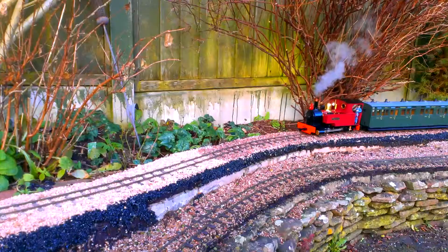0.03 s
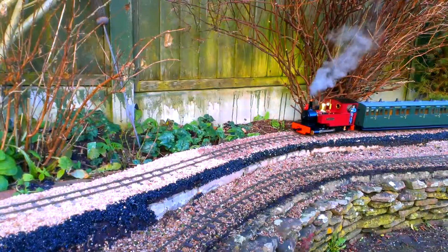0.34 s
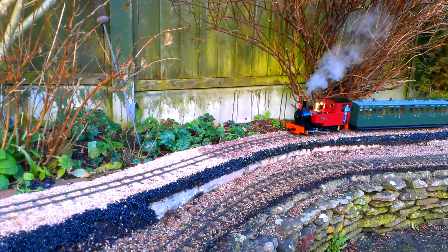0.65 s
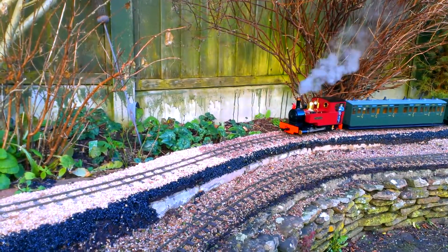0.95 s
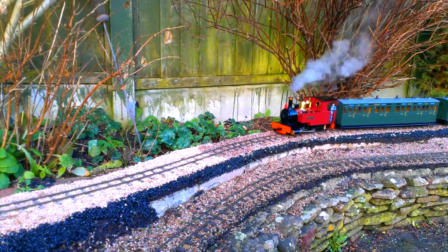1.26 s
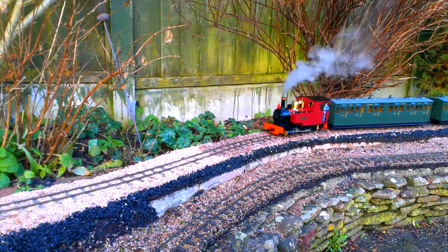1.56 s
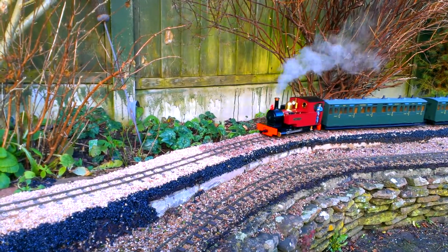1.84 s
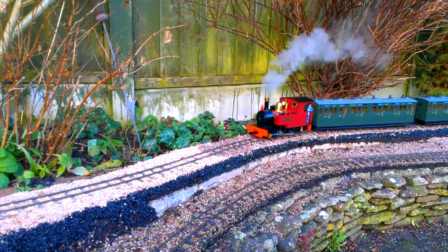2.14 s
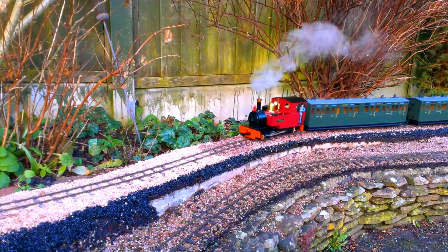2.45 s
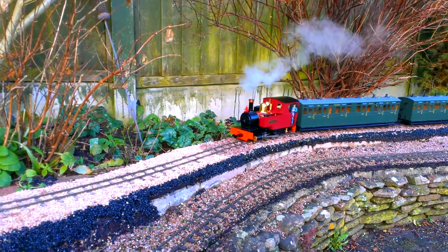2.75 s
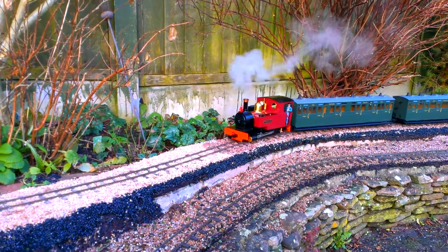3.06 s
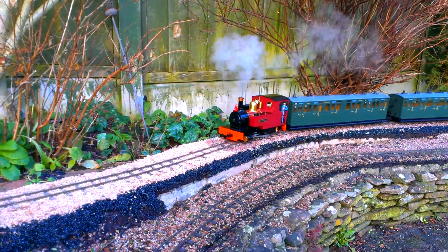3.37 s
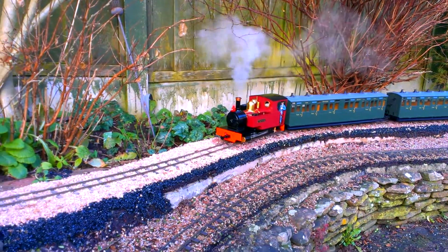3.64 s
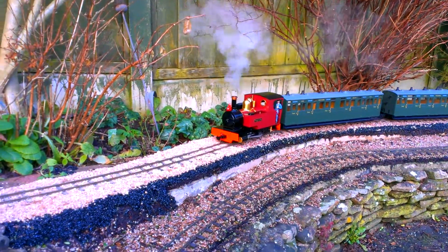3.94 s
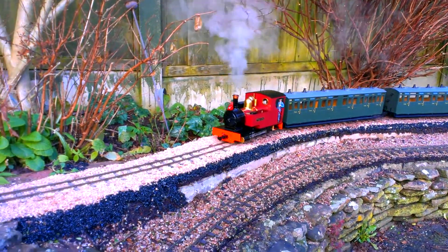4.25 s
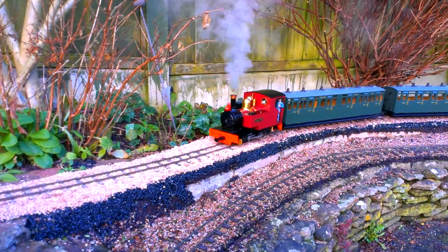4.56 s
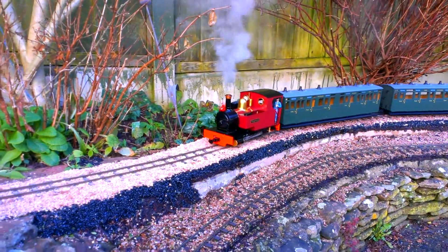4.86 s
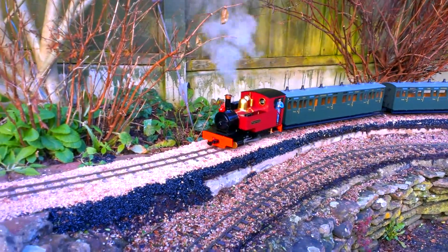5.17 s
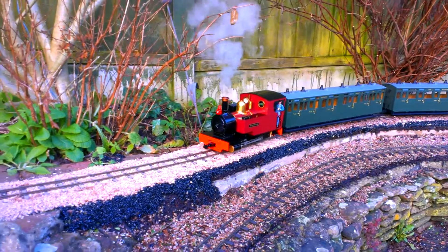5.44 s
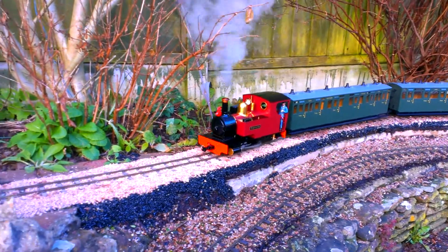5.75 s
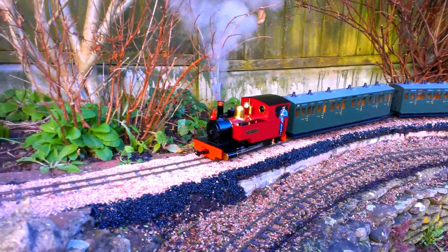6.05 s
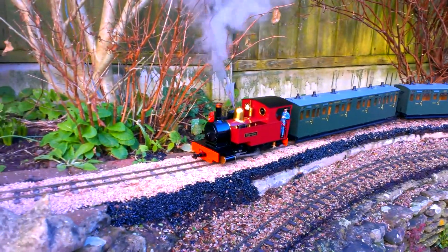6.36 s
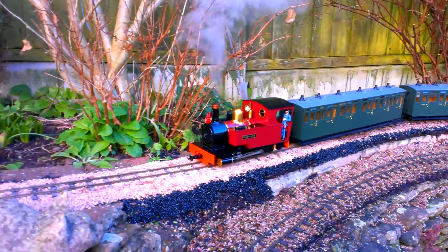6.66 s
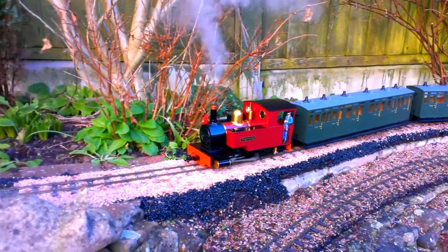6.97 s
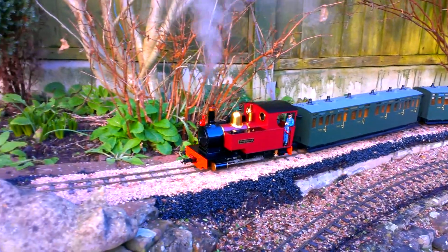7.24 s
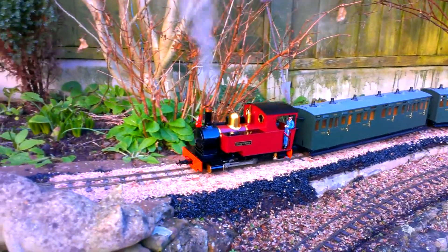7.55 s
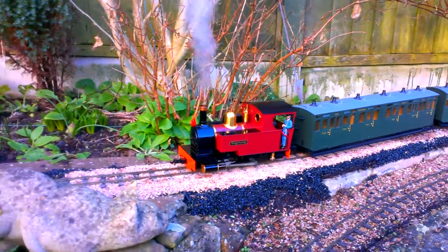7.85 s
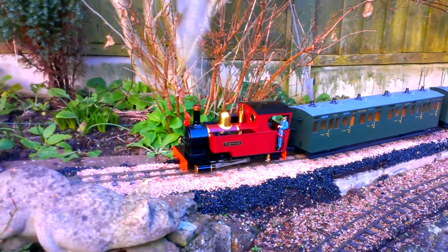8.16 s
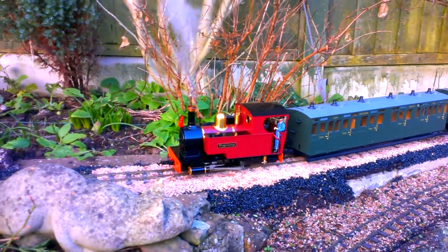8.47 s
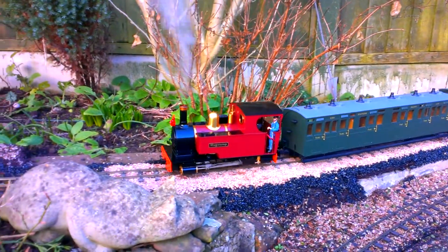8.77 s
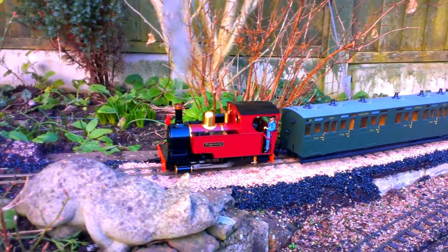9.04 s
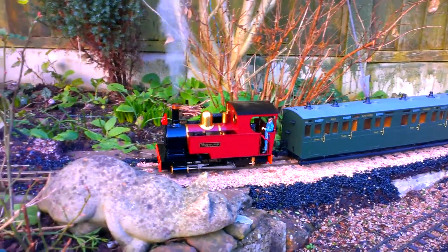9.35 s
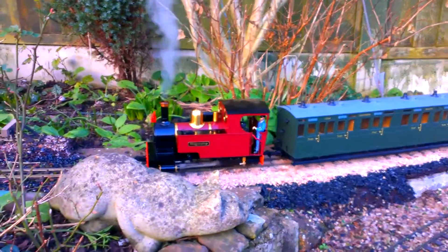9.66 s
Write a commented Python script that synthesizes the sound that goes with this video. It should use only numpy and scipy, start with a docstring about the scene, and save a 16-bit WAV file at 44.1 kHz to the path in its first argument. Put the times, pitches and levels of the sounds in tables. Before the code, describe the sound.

A small model steam locomotive is heard outdoors from the very start, chuffing at about six puffs a second in a slightly uneven four-beat pattern. Each puff is a bright, wet burst of steam with a light ring from the chimney, and a thin, high, whistling hiss leaks between the beats. At about 2 seconds the engine stops labouring: the ring softens and the high hiss becomes clearer. From about 3 to 8 seconds it comes steadily closer to the single microphone, the puffs growing fuller and their tone sweeping gently. Underneath are a soft, flickering burner roar, a faint wheel rumble and a barely audible distant drone. The wheels knock softly over rail joints around 3.5 and 4.5 seconds, and a few more times between 7 and 9 seconds. The hiss swells at about 9 seconds, with the engine close and still chuffing.

```python
"""Live-steam garden locomotive

A small engine pulls its carriages towards one microphone, at about six chuffs a second. Turbulent steam
leaks and puffs through blast pipe and chimney, spitting droplets; the burner roars softly and the wheels
rumble over a faint, distant drone. Reflections from the ground, a wall and a wooden fence interfere with
the direct sound, so that its colour sweeps as the engine comes nearer."""
import sys
import numpy as np
from scipy import signal
from scipy.fft import rfft, irfft
from scipy.io import wavfile
from scipy.ndimage import uniform_filter1d, map_coordinates

SR = 44100
rng = np.random.default_rng(int(sys.argv[2]) if len(sys.argv) > 2 else 0)


def generate_wav(signal):
    """Clip the signal to [-1, 1] and save it as 16-bit WAV at the path in sys.argv[1]."""
    frames = np.transpose(np.atleast_2d(signal))
    scaled = np.clip(frames, -1, 1) * 32767
    pcm = np.round(scaled).astype(np.int16)
    wavfile.write(sys.argv[1], SR, pcm)


N = 428211
TIME = np.arange(N) / SR

# spectra of the drone, rolling wheels, joint knocks and burner: (frequency [Hz], level [dB])
DRONE_SPECTRUM = [(22, -20), (45, -25), (70, -15), (95, -8), (113, -1.5), (130, -12), (200, -12)]
RUMBLE_SPECTRUM = [(60, -42), (110, -45), (140, -18), (190, -5.5), (300, 0), (370, 1), (500, -4.5),
                   (700, -14.5), (1300, -42), (3000, -23)]
KNOCK_SPECTRUM = [(130, -21), (240, -11), (350, 14), (430, 4), (700, -20), (1400, -26)]
BURNER_SPECTRUM = [(450, -21.5), (680, -12.5), (800, -7), (920, 2.5), (1010, -1.5), (1150, -17),
                   (1600, -28)]
# spectra of the five voices of the exhaust: (frequency [Hz], level [dB])
GUSH_SPECTRUM = [(700, -27.5), (1130, -16), (1380, 2), (1600, -4.5), (1870, 3), (2300, 0), (2650, -2.5),
                 (3050, 4), (3400, -2.5), (4000, -31)]
HISS_SPECTRUM = [(4300, -8), (4950, -12.5), (5500, -8), (6300, -0.5), (6900, 2.5), (7300, -7.5),
                 (8000, -24)]
SPRAY_SPECTRUM = [(9500, -10), (10600, -6), (11400, -6.5), (12700, -3), (14000, -6.5), (16000, -8)]
CHIMNEY_SPECTRUM = [(2700, -13), (3400, -13.5), (3650, 1), (3850, 2), (4080, -2.5), (4400, -9.5),
                    (4800, -16.5), (5700, -28)]
NOZZLE_SPECTRUM = [(6800, -29), (7500, -20), (8100, -10), (8650, -4.5), (9020, 2.5), (9350, -4.5),
                   (9900, -15), (10600, -23), (11400, -42), (14000, -49)]
# wheels meeting rail joints: (time [s], relative level [dB])
JOINT_KNOCKS = [(3.581, -50), (4.486, -48), (7.225, -55.5), (8.457, -42.5), (8.795, -43), (9.226, -48.5)]
# exhaust beats, four to a wheel turn: (crest time [s], relative level [dB], added chimney ring [dB])
EXHAUST_BEATS = [(.151, -24, 3.5), (0.375, -20, 3), (.625, -19, 2), (.778, -20.5, 2), (0.987, -16, -1),
                 (1.205, -16.5, 0.5), (1.411, -19, 1), (1.534, -19, 1), (1.725, -14.5, 0.5),
                 (1.925, -19.5, 3), (2.13, -20.5, 3.5), (2.255, -21, 6), (2.428, -19.5, 2),
                 (2.617, -18.5, 2.5), (2.78, -18.5, -1.5), (2.9, -17.5, 1.5), (3.049, -17.5, 4.5),
                 (3.239, -19.5, -2.5), (3.42, -20.5, 0.5), (3.537, -22, 0), (3.693, -19.5, 0),
                 (3.87, -19, -1.5), (4.049, -21, -1), (4.168, -20, -4), (4.336, -18, -7), (4.514, -19, -6),
                 (4.696, -16.5, -1), (4.812, -20, -1.5), (4.957, -18, -2.5), (5.122, -17.5, 2),
                 (5.283, -17, -0.5), (5.391, -19, -1), (5.541, -18.5, 2), (5.704, -16.5, 0.5),
                 (5.876, -19, -1.5), (5.984, -18, -4.5), (6.149, -17, -9.5), (6.323, -15.5, -3),
                 (6.494, -19.5, 1.5), (6.613, -20, -1), (6.761, -18, -0.5), (6.945, -17, 1),
                 (7.12, -19.5, 4), (7.235, -19, 2), (7.401, -18.5, 2), (7.589, -16.5, 2.5), (7.78, -14, 2),
                 (7.911, -16, -2), (8.109, -19, 0.5), (8.327, -21, 4), (8.541, -24, 6), (8.67, -23.5, 2.5),
                 (8.862, -24, 4), (9.049, -21, 5.5), (9.249, -23, -0.5), (9.371, -20.5, -7),
                 (9.544, -19.5, -10)]
# slow swells of three voices: (time [s], gush gain [dB], hiss gain [dB], burner gain [dB])
VOICE_SWELLS = [(0, 1, -0.5, 2.5), (1.9, 2.5, 0.5, -0.5), (2.5, 0.5, 0, 2.5), (3.05, 3, 1.5, 0.5),
                (3.55, -1, 6, -1), (4.5, 2, -1, -0.5), (5.1, -0.5, 0.5, 2), (5.9, 0.5, -5.5, 6.5),
                (6.4, 0.5, -2, 2), (7.5, 0.5, -4, -0.5), (8.3, 3, -1.5, 0.5), (9.1, 2.5, 8.5, 1.5),
                (9.7, -1.5, 7.5, 3.5)]
# the engine's approach: (time [s], nearness [0 far, 1 close], ground reflection lag [ms], its gain [ratio])
APPROACH_PATH = [(0, 0.076, 0.24, 0.1), (2, 0.026, 0.21, 0.39), (3.5, 0.24, 0.25, 0.6),
                 (4.3, .31, 0.27, 0.72), (5.3, 0.48, 0.34, 0.23), (6, 0.67, 0.52, 0.48),
                 (7, .79, 0.5536, 0.52), (8, 0.97, 0.71, 0.18), (9.2, .99, 0.83, 0.72),
                 (9.7, 0.99, 0.81, 0.64)]
# wall, stones and fence: (far lag [ms], close lag [ms], gain [ratio to ground reflection], cutoff [Hz])
REFLECTORS = [(1.126, 1.704, 0.67, 2700), (0.88, 2.6, 0.32, 3700), (1.61, 4.45, 0.16, 4600),
              (2.5, 5.85, 0.56, 9100)]
# weak echoes off stones, shrubs and carriages: (lag after the ground reflection [ms], level [dB])
SCATTERED_ECHOES = [(2.9, -20), (7.3, -14.5), (12.6, -16.5), (21, -21), (33, -23)]

# relative voice levels: (engine labouring [dB], engine eased [dB], gain when close [dB])
DRONE_DB, RUMBLE_DB, BURNER_DB = (-76, -85, -4), (-58.5, -64.5, 9.5), (-46, -56, 8)
GUSH_DB, HISS_DB, SPRAY_DB = (-12.5, -16.5, 6.5), (-17, -15.5, -2), (-28, -25.5, 2)
CHIMNEY_DB, NOZZLE_DB = (-0.65, -11, 5.2), (-7.5, -0.95, -2.5)
# resonance centres: (far [Hz], close [Hz])
CHIMNEY_HZ, NOZZLE_HZ = (3770, 4110), (8970, 9090)

EASE_AT_S, EASE_LENGTH_S = 1.858, 0.15  # the engine stops labouring
RISE_S, FADE_SHARE = 0.018, 0.33  # a puff rises as the valve opens and fades over a share of the gap
AFTERPUFF_SHARE, AFTERPUFF_DB, AFTERPUFF_S = 0.572, -9, 0.023  # place in gap, level re beat, half-width
LEAK_DB, LEAK_FOLLOW = -26.5, 0.32  # steam between beats; dB gained per dB of beat level


def undb(db):
    """Amplitude grows tenfold for every 20 dB."""
    return 10 ** (np.asarray(db) / 20)


def curves(table):
    """Linear interpolation turns each column after the first into a function of time."""
    times, *columns = np.transpose(table)
    return [np.interp(TIME, times, column) for column in columns]


def wander(rate_hz):
    """Random modulation of unit variance, interpolated between rate_hz values a second."""
    drift = np.interp(TIME * rate_hz, np.arange(N // 10), rng.standard_normal(N // 10))
    return drift / np.std(drift)


def shaped(source, spectrum):
    """Source-filter principle: impose a spectrum, with skirts of 40 dB an octave, at unit rms."""
    hz, db = np.transpose(spectrum)
    octave = np.log2(np.fft.rfftfreq(N, 1 / SR) + 1)
    skirt_db = 40 * np.abs(octave - np.clip(octave, np.log2(hz[0]), np.log2(hz[-1])))
    response = undb(np.interp(octave, np.log2(hz), db) - skirt_db)
    filtered = irfft(rfft(source) * response, N)
    return filtered / np.std(filtered)


def retuned(sound, ratio):
    """Time scaling shifts all resonances by the same changing ratio."""
    return map_coordinates(sound, [np.cumsum(ratio)], order=3, mode="grid-wrap")


def delayed(sound, lag_ms):
    """Propagation delay over a longer path, whose length may change."""
    return map_coordinates(sound, [np.arange(N) - lag_ms * SR / 1000], order=3)


def reflected(sound, lag_ms, cutoff_hz):
    """A rough surface scatters the treble away, so its reflection is dull as well as late."""
    lowpass = signal.butter(2, min(cutoff_hz, 0.45 * SR), fs=SR, output="sos")
    return delayed(signal.sosfiltfilt(lowpass, sound), lag_ms)


def voice_db(levels):
    """Gains add in decibels: one term for the engine's effort, one for its nearness."""
    labour_db, eased_db, close_db = levels
    eased = np.clip((TIME - EASE_AT_S) / EASE_LENGTH_S + 0.5, 0, 1)
    nearness = curves(APPROACH_PATH)[0]
    return labour_db + (eased_db - labour_db) * eased + close_db * nearness


def distant_drone():
    """Amplitude-modulated low noise: a faint drone that wavers, strongest at first."""
    return undb(voice_db(DRONE_DB) + 1.4 * wander(6.3)) * shaped(rng.standard_normal(N), DRONE_SPECTRUM)


def garden_reflections(sound):
    """Comb filtering: reflections interfere with the sound; the notches sweep as their lags change."""
    nearness, ground_ms, ground_gain = curves(APPROACH_PATH)
    with_ground = sound + ground_gain * reflected(sound, ground_ms, cutoff_hz=6000)  # off gravel
    walls = sum(gain * reflected(with_ground, far_ms + (close_ms - far_ms) * nearness, cutoff_hz)
                for far_ms, close_ms, gain, cutoff_hz in REFLECTORS)
    scattered = sum(undb(db) * delayed(with_ground, ground_ms + ms) for ms, db in SCATTERED_ECHOES)
    return with_ground + ground_gain * walls + scattered


def wheels():
    """Rolling contact excites a low rumble; impacts at the rail joints add soft knocks."""
    rolling = undb(voice_db(RUMBLE_DB) + 1.6 * wander(24))
    rumble = rolling * shaped(rng.standard_normal(N), RUMBLE_SPECTRUM)
    impacts = sum(undb(db) * np.exp(-((TIME - at_s) / 0.034) ** 2) for at_s, db in JOINT_KNOCKS)
    return rumble + undb(-5) * impacts * shaped(rng.standard_normal(N), KNOCK_SPECTRUM)


def burner():
    """Combustion noise, coloured by the resonance of the flue, makes a soft, flickering roar."""
    flame = shaped(rng.standard_normal(N), BURNER_SPECTRUM)
    _, _, swell_db = curves(VOICE_SWELLS)
    return undb(voice_db(BURNER_DB) + swell_db + 1.77 * wander(26)) * flame


def steam_flow():
    """Incoherent powers add: leak, beats and afterpuffs give the envelopes of flow and chimney ring."""
    times, levels, _ = np.transpose(EXHAUST_BEATS)
    gaps = np.append(np.diff(times), np.diff(times).mean())
    flow_power = undb(LEAK_DB + LEAK_FOLLOW * np.interp(TIME, times, levels - levels.mean())) ** 2
    ring_power = flow_power.copy()
    jitter = rng.standard_normal((len(EXHAUST_BEATS), 2))
    for (crest_s, db, ring_db), gap, (late, loud) in zip(EXHAUST_BEATS, gaps, jitter):
        span = slice(*np.searchsorted(TIME, [crest_s - 0.25, crest_s + 0.5]))
        age = TIME[span] - crest_s
        beat = np.exp(-np.where(age < 0, (age / RISE_S) ** 2, np.abs(age / (gap * FADE_SHARE)) ** 1.5))
        after_age = age - gap * (AFTERPUFF_SHARE + 0.096 * late)
        afterpuff = undb(AFTERPUFF_DB + 2.35 * loud) * np.exp(-(after_age / AFTERPUFF_S) ** 2)
        puff = undb(db) * np.hypot(beat, afterpuff)
        flow_power[span] += puff ** 2
        ring_power[span] += (undb(ring_db) * puff) ** 2
    return np.sqrt(flow_power), np.sqrt(ring_power)


def wet_steam(eddies, spectrum, spit_db, droplets_per_s=420):
    """Jet noise modulated by eddies, plus shot noise of bursting droplets, filtered to a spectrum."""
    droplets = (rng.random(N) < droplets_per_s / SR) * rng.uniform(-1.03, 1, N)
    jet = eddies * rng.standard_normal(N)
    return shaped(jet + undb(spit_db) * droplets / np.std(droplets), spectrum)


def exhaust():
    """One turbulent flow makes a gush, a hiss and a spray, and drives chimney and nozzle resonances."""
    nearness = curves(APPROACH_PATH)[0]
    chimney_hz, nozzle_hz = (far + (close - far) * nearness for far, close in (CHIMNEY_HZ, NOZZLE_HZ))
    gush_db, hiss_db, _ = curves(VOICE_SWELLS)
    eddies = undb(wander(330) + 0.5 * wander(70))
    gush = undb(voice_db(GUSH_DB) + gush_db) * wet_steam(eddies, GUSH_SPECTRUM, spit_db=-1)
    hiss = undb(voice_db(HISS_DB) + hiss_db) * wet_steam(eddies, HISS_SPECTRUM, spit_db=-17)
    spray = undb(voice_db(SPRAY_DB) + 0.28 * hiss_db) * wet_steam(eddies, SPRAY_SPECTRUM, spit_db=-11)
    # each resonance is shifted from the peak of its spectrum to its moving centre
    ring = retuned(wet_steam(eddies, CHIMNEY_SPECTRUM, spit_db=-9), chimney_hz / 3850)
    whistle = retuned(wet_steam(eddies, NOZZLE_SPECTRUM, spit_db=-13), nozzle_hz / 9020)
    chimney = undb(voice_db(CHIMNEY_DB)) * ring
    nozzle = undb(voice_db(NOZZLE_DB)) * whistle
    flow, ringing = steam_flow()
    # a strong puff is fuller and wetter; the thin leak between puffs favours the nozzle's whistle
    surge = flow / np.sqrt(uniform_filter1d(flow ** 2, size=SR // 2))
    blast = (gush + hiss + spray) * surge ** 0.08 + nozzle * surge ** -0.1
    return undb(-4) * (flow * blast + ringing * chimney)


def scene():
    """Superposition at one point: engine, reflections, wheels and drone, alike in both channels."""
    roar, rolling = burner(), wheels()
    mono = garden_reflections(exhaust() + roar) + rolling + distant_drone()
    return np.array([mono, mono])


def record(dry, start_s=0.1, fade_s=0.025, cutoff_hz=15750):
    """Gating and band limiting: the sound fades in after a brief silence and loses its top treble."""
    fade_in = np.clip((TIME - start_s) / fade_s, 0, 1)
    lowpass = signal.ellip(10, 0.2, 70, cutoff_hz, fs=SR, output="sos")
    return signal.sosfilt(lowpass, dry * fade_in)


dry = scene()
out = record(dry)
generate_wav(out)
```